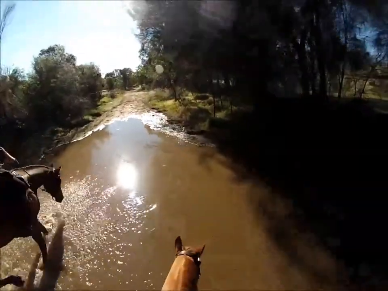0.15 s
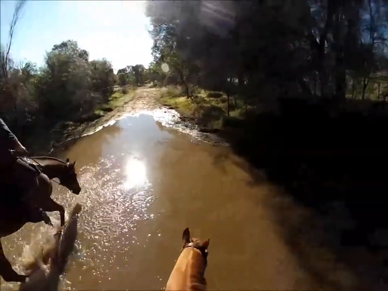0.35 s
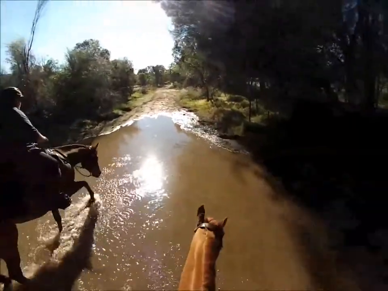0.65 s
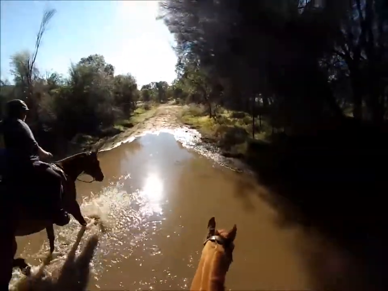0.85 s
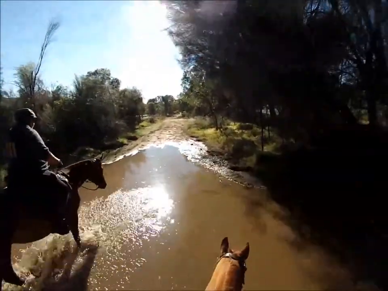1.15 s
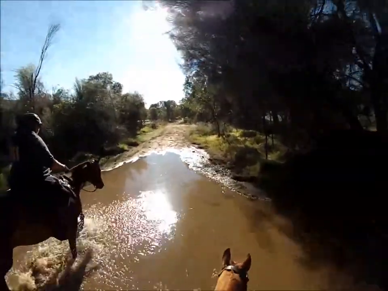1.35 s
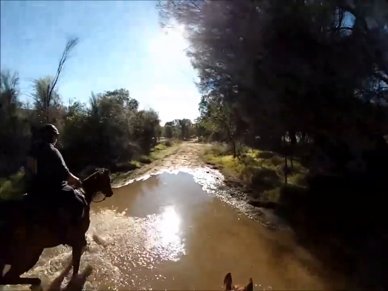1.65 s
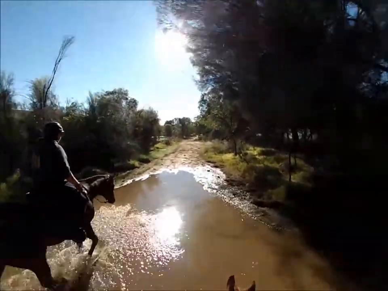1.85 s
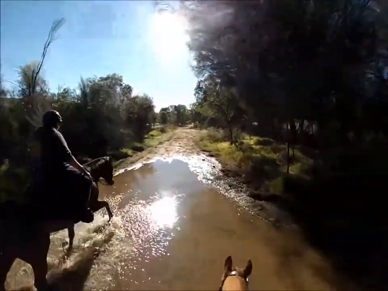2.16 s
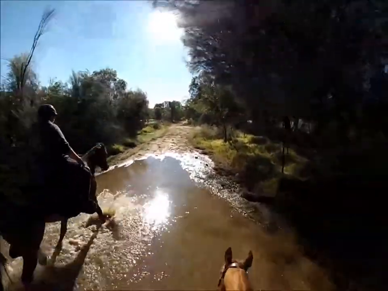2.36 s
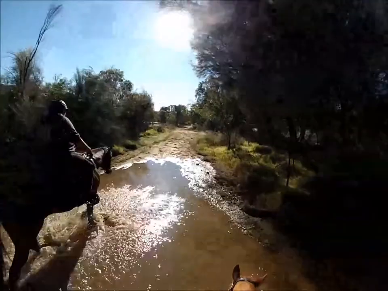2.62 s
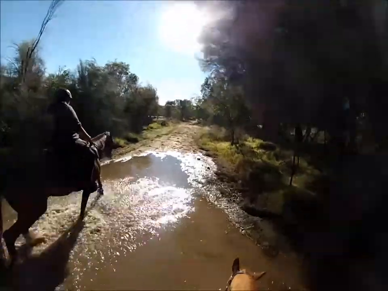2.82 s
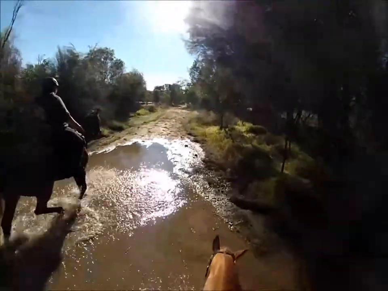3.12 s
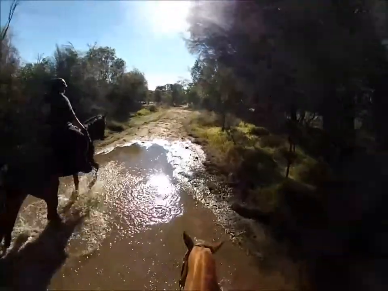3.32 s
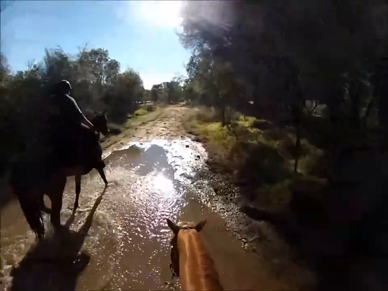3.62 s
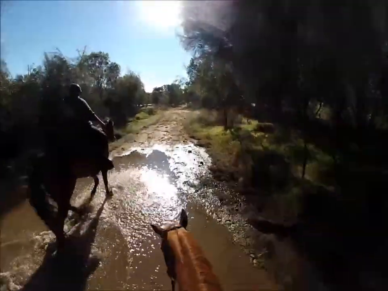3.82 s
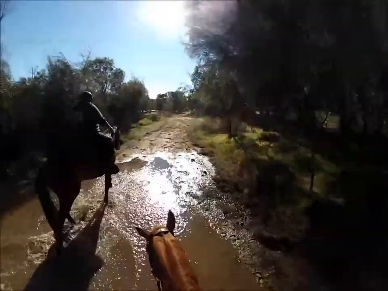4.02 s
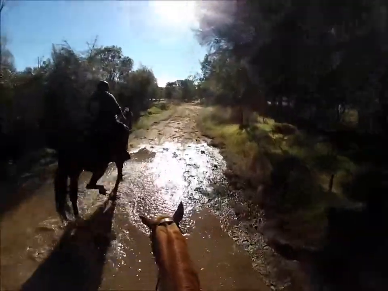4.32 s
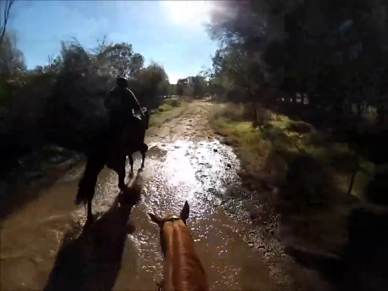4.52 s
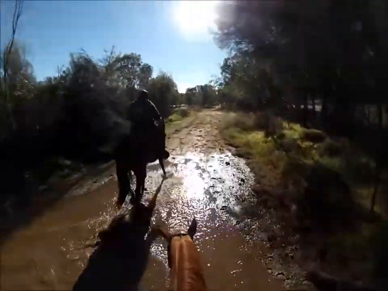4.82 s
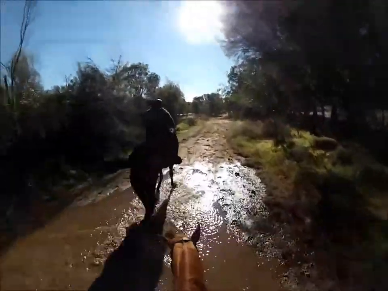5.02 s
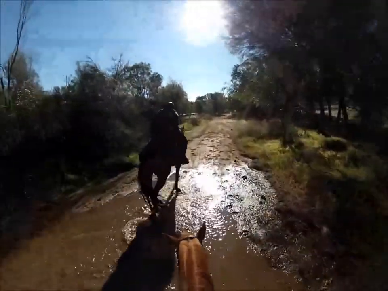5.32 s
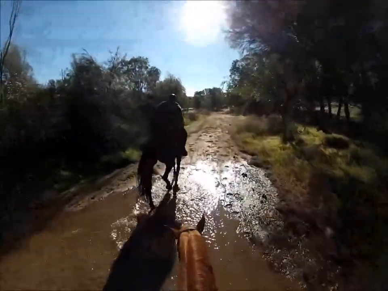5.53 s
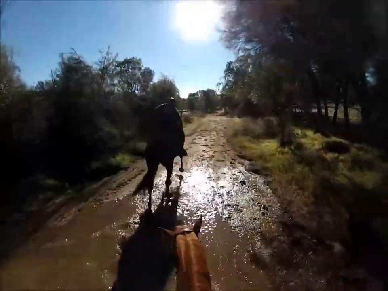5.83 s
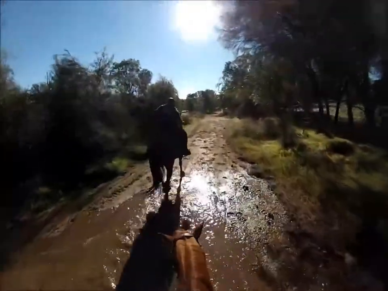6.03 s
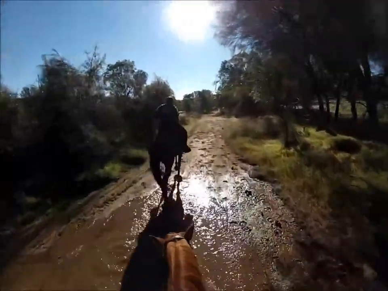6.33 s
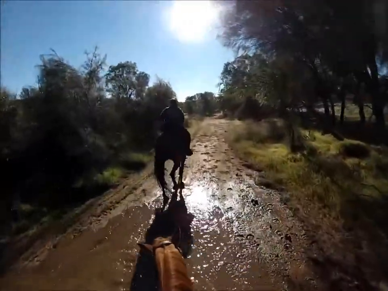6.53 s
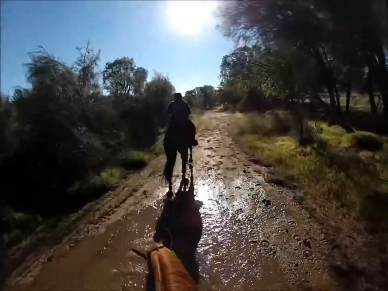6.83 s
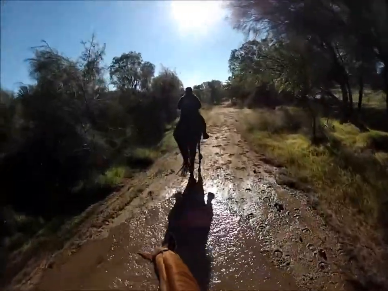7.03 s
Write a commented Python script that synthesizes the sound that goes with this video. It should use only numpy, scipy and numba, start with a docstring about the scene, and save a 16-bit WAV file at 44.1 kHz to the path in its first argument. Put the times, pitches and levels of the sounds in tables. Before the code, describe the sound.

Close, slightly boxy sound from a camera carried on horseback: rhythmic watery sweeps, fizzing bubbles, drips and wet slaps over faint outdoor hiss. Low thuds from the stride jolt the mount throughout, and one much louder deep shudder strikes just after one second. From three seconds the deep slosh thins, leaving separate shallow splashes and slaps on mud.

```python
"""Horses wade through a flooded track: legs sweep up bubbles, splash and spray; hooves slap and plop.
Throughout, jolts of the stride thud a springy camera mount, air buffets its case and the case rings.
At about 1 s a short swish and a dull rub of gear lead into a heavy judder of the mount, over by 1.4 s.
From 3 s the water gets shallower: big bubbles thin out and the churned wash dies away towards wet mud.
Water is clouds of rising damped sines; slaps are shaped noise; the mount is low sines and noise."""
import sys
import numpy as np
from scipy import signal
from scipy.fft import rfft, irfft
from scipy.io import wavfile
from scipy.ndimage import uniform_filter1d
from numba import njit

SR = 44100
rng = np.random.default_rng(int(sys.argv[2]) if len(sys.argv) > 2 else 0)


def dump_mix(stems):
    """Bounce the given channels to the path in sys.argv[1] as a 16-bit WAV at rate SR."""
    frames = np.atleast_2d(stems).T  # one column per channel
    limited = np.clip(frames, -1, 1)  # hard clip at full scale
    pcm = np.round(limited * 32767).astype(np.int16)
    wavfile.write(sys.argv[1], SR, pcm)


N = 316061
T = np.arange(N) / SR

# jolts of the mount: t/s, swing level before common gain/dB, swing t60/s, knock level before offset/dB
JOLTS = [(0.01, -38.5, 0.47, -17), (0.352, -32.5, 0.14, -12.5), (0.784, -35.5, 0.3, -15),
         (0.862, -38, 0.11, -22), (1.575, -37, 0.29, -10.5), (1.753, -35, 0.31, -14),
         (1.857, -31.5, 0.19, -28), (1.941, -29.5, 0.17, -36), (2.735, -26.5, 0.42, -13.5),
         (2.963, -33, 0.14, -24), (3.062, -36, 0.19, -10), (3.307, -30, 0.25, -7.5), (3.529, -36, 0.2, -19),
         (3.659, -37.5, 0.17, -11), (3.818, -28, 0.16, -17), (4.111, -36, 0.28, -24),
         (4.543, -30.5, 0.38, -12.5), (4.905, -37.5, 0.17, -16), (5.321, -31.5, 0.23, -16),
         (5.68, -40, 0.28, -29), (5.996, -23.5, 0.2, -17.5), (6.064, -35.5, 0.39, -26),
         (6.333, -37, 0.23, -17), (6.744, -33.5, 0.14, -27), (6.804, -25, 0.21, -20.5)]
# resonances of the case: f/Hz, width at half the lift/Hz, lift/dB
CASE_PEAKS = [(1511, 490, 14.5), (2078, 283, 13), (2385, 480, 10.5), (3107, 180, 5), (3616, 480, 7),
              (4160, 290, 4), (4920, 460, 7), (6580, 380, 7.5), (7420, 1000, 5.5), (8970, 290, 6),
              (11160, 670, 6)]
# transmission of the case walls: f/Hz, gain/dB
CASE_WALL = [(200, 4.5), (600, -2.5), (1000, 3.5), (1850, -3), (2800, -4.5), (4500, -9.5), (6000, -9),
             (8300, -15), (10000, -20), (13000, -17.5), (15500, -30)]
# legs sweeping through water: crest t/s, splash/dB, spray/dB, deep slosh/dB, length/s
STEPS = [(0.034, -58, -73, -66, 0.096), (0.306, -56, -71, -60, .05), (0.406, -56.5, -75, -62.5, 0.065),
         (0.615, -58, -65, -64, 0.087), (0.72, -56, -67.5, -64, 0.062), (0.87, -55.5, -72, -62.5, 0.1),
         (1.053, -50.5, -70, -61, 0.13), (1.158, -57, -77, -54, 0.042), (1.446, -55, -65.5, -69, 0.13),
         (1.555, -57.5, -66, -65, 0.095), (1.84, -53.5, -63, -59.5, 0.063), (1.954, -58, -77, -59.5, 0.033),
         (2.206, -54, -60, -66.5, 0.11), (2.47, -60.5, -65, -65, 0.11), (2.57, -53, -64.5, -59.5, 0.084),
         (2.738, -56.5, -65, -61.5, .1), (2.974, -53.5, -62.5, -66, 0.2), (3.13, -53.5, -67, -62, 0.043),
         (3.21, -54.5, -61.5, -61, 0.082), (3.367, -72, -69, -74, .07), (3.523, -53, -66.5, -63.5, 0.12),
         (3.653, -56, -68, -68, 0.054), (3.842, -53, -62, -64.5, 0.08), (3.99, -62, -67.5, -62.5, .08),
         (4.145, -53.5, -67, -64, 0.077), (4.276, -62, -70, -87, .06), (4.444, -52, -64, -65, 0.095),
         (4.727, -53.5, -68, -63.5, 0.074), (4.855, -59.5, -68.5, -74, 0.17),
         (5.03, -53.5, -64.5, -69, 0.072), (5.31, -54.5, -76, -64, 0.06), (5.467, -61, -84, -74, 0.12),
         (5.654, -54, -72, -65, 0.12), (5.855, -61, -85, -75, 0.068), (6.007, -58.5, -74, -69, 0.12),
         (6.264, -65, -70, -74, 0.046), (6.364, -55.5, -78, -68, 0.087), (6.516, -66, -73.5, -70, 0.052),
         (6.713, -60, -79, -65.5, 0.093), (7.028, -55.5, -72, -66, 0.081)]


def undb(db):
    """Decibels to gain."""
    return 10 ** (np.asarray(db) / 20)


def curves(rows):
    """Interpolate each column of a table over time."""
    s, *columns = np.transpose(rows)
    return [np.interp(T, s, c) for c in columns]


def band(x, lo_hz, hi_hz, order=3):
    """Butterworth band-pass."""
    sos = signal.butter(order, [lo_hz, min(hi_hz, .48 * SR)], "band", fs=SR, output="sos")
    return signal.sosfilt(sos, x)


def unit(x, lo_hz, hi_hz):
    """Scale to rms 1 within a band."""
    return x / np.std(band(x, lo_hz, hi_hz))


def add(out, s, x):
    """Mix a sound in at a time in seconds."""
    i = max(int(s * SR), 0)
    out[i:i + len(x)] += x[:max(N - i, 0)]


def walk(rate_hz):
    """Random levels held for 1 / rate, smoothed by two moving averages; spread near 1."""
    k = int(SR / rate_hz)
    held = np.repeat(rng.standard_normal(N // k + 1), k)
    smooth = uniform_filter1d(uniform_filter1d(held, k), k)
    return 1.17 * smooth[:N]


def colour(x, points, peaks=(), size=2048):
    """Minimum-phase filter: a smooth spectrum with resonant peaks on it."""
    f = np.fft.rfftfreq(size, 1 / SR)
    hz, db = np.transpose(points)
    gain_db = np.interp(np.log(f + 1), np.log(hz), db)
    for centre_hz, width_hz, lift_db in peaks:
        gain_db = gain_db + lift_db * .5 ** ((2 * (f - centre_hz) / width_hz) ** 2)
    # folding the cepstrum makes the filter causal
    cepstrum = irfft(np.log(undb(gain_db)))
    cepstrum[1:size // 2] *= 2
    cepstrum[size // 2 + 1:] = 0
    impulse = irfft(np.exp(rfft(cepstrum)))
    return signal.oaconvolve(x, impulse)[:len(x)]


def through_case(x):
    """Walls dull the sound; the hollow case adds resonances."""
    return colour(x, CASE_WALL, CASE_PEAKS)


@njit
def ring(start, hz, cycles, size, glide):
    """Sum of damped sines that rise in pitch as they fade."""
    out = np.zeros(N)
    for k in range(len(start)):
        length = int(cycles[k] * SR / hz[k]) + 2
        i0, phase = int(start[k]), 0.
        for i in range(min(length, N - i0)):
            age = i / length
            phase += 2 * np.pi * min(hz[k] * (1 + glide * age) / SR, .45)
            out[i0 + i] += size[k] * np.exp(-5 * age) * np.sin(phase)
    return out


def bubbles(rate, lo_hz, hi_hz, cycles, spread_db, glide):
    """Random cloud of bubbles, rate per second; a positive spread makes many faint, a few loud."""
    when, pitch, life, strength = rng.random((int(rate * N / SR), 4)).T
    hz = lo_hz * (hi_hz / lo_hz) ** pitch
    size = undb(-spread_db * np.log(strength + .015))
    # life is counted in cycles, so high bubbles die sooner; amplitude grows with pitch
    return ring(when * N, hz, cycles * (.5 + life), size * hz / hi_hz, float(glide))


def outdoors(db=-64):
    """Steady outdoor hiss: noise with a fixed spectrum."""
    # f/Hz, relative density/dB
    spectrum = [(100, 10.5), (250, 7.5), (500, 2.5), (1000, -5), (2200, 1), (3000, -4), (6000, -6.5),
                (10000, -9.5), (15500, -17.5)]
    hiss = colour(rng.standard_normal(N), spectrum)
    return hiss / np.std(hiss) * undb(db)


def tremble():
    """Between jolts the sprung mount shivers near 57 Hz; slow air buffets the case, more at each lurch."""
    # shiver: t/s, level/dB
    shiver = [(0, -44), (0.45, -47.5), (0.66, -58), (0.85, -42.5), (1.5, -48.5), (1.95, -44), (2.15, -49.5),
              (2.5, -47), (3.7, -46.5), (4.3, -47), (4.7, -50), (5.6, -47.5), (6.6, -53.5), (7.1, -45.5)]
    steady_air_db, lurch_air_db, lurch_s = -48.5, -43.5, 0.1
    # f/Hz, relative gain/dB
    response = [(20, -14.5), (42, -8), (57, 7.0), (68, -8.0),
                (95, -14.5), (150, -24.5), (230, -35.0), (600, -55.5)]
    mount = colour(rng.standard_normal(N), response, size=8192)
    air = band(rng.standard_normal(N), 8.54, 24.26)
    lurch = sum(np.exp(-((T - s - lurch_s / 2) / lurch_s) ** 2) for s, *_ in JOLTS)
    buffet = undb(steady_air_db) + undb(lurch_air_db) * np.minimum(lurch, 1)
    return mount / np.std(mount) * undb(curves(shiver)[0]) + air / np.std(air) * buffet


def rub(at_s=0.98, length_s=0.1, db=-54):
    """Gear rubs the mount ahead of the heavy bump: a dense cloud of low, short rings."""
    grains = bubbles(rate=970, lo_hz=100.5, hi_hz=405, cycles=6.8, spread_db=5.5, glide=0)
    scuff = band(grains, 78, 290, order=2)
    swell = np.exp(-.5 * ((T - at_s) / length_s) ** 2)
    return scuff / np.std(scuff) * undb(db) * swell


def swish(at_s=0.95, length_s=0.037, db=-55.0, trail_s=0.081):
    """A ragged swish before the heavy bump: narrow-band rings that swell quickly and trail off."""
    grains = bubbles(rate=1500, lo_hz=4400, hi_hz=5400, cycles=25, spread_db=3.0, glide=0)
    hiss = band(grains, 4680, 5120, order=1)
    rise = np.exp(-.5 * ((T - at_s) / length_s) ** 2)
    fall = 1 / (1 + ((T - at_s) / trail_s) ** 2)
    return hiss / np.std(hiss) * undb(db) * np.where(T < at_s, rise, fall)


def thuds():
    """A jolt knocks the mount, which then swings at its own low pitch."""
    out, t = np.zeros(N), T[:SR // 2]
    swing_hz, knock_hz, knock_t60_s = 57, 102, 0.087
    attack = 1 - np.exp(-(t / 0.007) ** 2)
    for s, db, t60_s, knock_db in JOLTS:
        swing = np.sin(2 * np.pi * swing_hz * t) * undb(-60 * t / max(t60_s, .05))
        knock = np.sin(2 * np.pi * knock_hz * t) * undb(knock_db + 11.5 - 60 * t / knock_t60_s)
        add(out, s, undb(db + 3.0) * attack * (swing + knock))
    return out


def judder():
    """A hard bump drives the mount against its stop: pitch and overtones shift, then it rings out."""
    # t/s, f/Hz, level/dB, second harmonic re fundamental/dB
    bump = [(1.0, 61, -42, -12), (1.04, 66, -32, -7), (1.06, 69, -17, -22), (1.086, 72.9, -18, -8),
            (1.115, 65.7, -15, -17.5), (1.141, 58.6, -13.5, -18.5), (1.165, 55.4, -9, -33),
            (1.2, 58.5, -18, -44), (1.28, 56.6, -29.5, -47), (1.38, 56.7, -51.5, -42)]
    hz, db, overtone_db = curves(bump)
    phase = 2 * np.pi * np.cumsum(hz) / SR
    stiff = undb(overtone_db)
    swing = np.sin(phase) + stiff * np.cos(2 * phase) + 0.28 * stiff ** 2 * np.sin(3 * phase)
    to_edge_s = np.minimum(T - bump[0][0], bump[-1][0] - T)
    return swing * undb(db) * np.clip(to_edge_s / 0.018, 0, 1)


def spatter(db=-71):
    """Flecks of water and mud land as single two-cycle ticks through the case."""
    ticks = through_case(bubbles(rate=70, lo_hz=1500, hi_hz=6960, cycles=2.0, spread_db=4.0, glide=0))
    return ticks / np.std(ticks) * undb(db)


def plops():
    """Air pockets close behind a leg; each rings briefly and rises as it nears the surface."""
    # t/s, level before trim/dB, f before trim/Hz
    pockets = [(.071, -48.5, 231), (.297, -49, 690), (0.353, -48, 320), (0.426, -47, 362),
               (0.758, -50, 338), (0.82, -53, 280), (1.004, -45, 294), (1.155, -43.5, 373),
               (1.521, -50.5, 294), (1.6, -51, 330), (1.792, -47, 340), (1.959, -48, 380),
               (2.287, -42, 277), (2.365, -47.5, 306), (2.691, -45.5, 360), (3.957, -56, 261),
               (4.014, -49, 899), (4.12, -50, 640), (5.67, -50, 790), (6.229, -46, 630)]
    s, db, hz = np.transpose(pockets)
    return ring(s * SR, hz * 0.972, np.full(len(s), 11.0), undb(db - 0.5), 0.13)


def hooves():
    """Slaps on water and mud: wet noise cracks ring the case, with a rising plip of trapped air."""
    # t/s, level/dB, treble before offset/dB, starting f of trapped air/Hz, t60 of cracks/s
    slaps = [(0.403, -44, -32, 1540, 0.073), (0.5142, -42, -37, 1520, 0.024),
             (0.7244, -44.5, -19, 1930, 0.048), (1.454, -43.5, -16, 2040, 0.05),
             (1.5434, -45, -29, 2030, 0.05), (1.9719, -40.5, -28, 2090, 0.053),
             (3.0989, -46, -22, 1350, 0.05), (3.1351, -41, -28, 1290, 0.045),
             (3.2174, -40, -19, 2150, 0.046), (3.8107, -40.5, -36, 1350, 0.064),
             (4.4323, -41.5, -26, 2210, 0.046), (4.7813, -36, -26.5, 2236, 0.019),
             (4.9541, -46.5, -28, 2170, 0.043), (5.0494, -46, -20, 2140, 0.055),
             (5.089, -46.5, -23, 1364, 0.046), (5.4106, -44.5, -21, 1990, 0.054),
             (5.64, -40.5, -23.5, 1990, 0.051), (5.6745, -47, -36, 2230, 0.042),
             (5.713, -45.5, -34, 2050, 0.064), (6.194, -48, -28, 2030, 0.052),
             (6.2317, -49.5, -24, 2020, 0.036), (6.3704, -46.5, -22, 2040, 0.043),
             (6.3994, -47.5, -37, 2060, 0.05), (6.7537, -50, -7, 2200, 0.046),
             (7.0294, -52, -17, 2090, 0.055)]
    out, t = np.zeros(N), T[:SR // 5]
    attack = np.minimum(t / .0015, 1)
    for s, db, treble_db, hz, t60_s in slaps:
        cracks = rng.standard_normal(len(t)) * undb(2.0 * rng.standard_normal(len(t)))
        cracks *= attack * undb(-60 * t / max(t60_s, .01))
        treble = undb(treble_db + 27.5) * band(cracks, 3050, 13300)
        slap = through_case(band(cracks, 580, 3000) + treble)
        plip = np.sin(2 * np.pi * hz * t * (1 + 2 * t)) * attack * undb(-5 - 60 * t / 0.06)
        add(out, s, (slap / np.abs(slap).max() + plip) * undb(db))
    return out


def surges(levels_db, hang=1):
    """Summed power of the steps: each swells to its crest, then falls back, hang times as long."""
    rise_share, fall_share = 0.97, 1  # of the step length
    power = np.zeros(N)
    for (s, *_, length_s), db in zip(STEPS, levels_db):
        age = (T - s) / max(length_s, .01)
        rise = (age / rise_share) ** 2
        fall = np.abs(age / (fall_share * hang)) ** 1.9
        shape = np.exp(-np.where(age < 0, rise, fall))
        power += (undb(db) * shape) ** 2
    return power


def water_levels():
    """Splash, spray and slosh in dB: powers of the steps add to the churned wash between them."""
    # wash, dying away as the horses leave the flood: t/s, level/dB
    wash = [(0, -60.5), (0.9, -57.5), (2.8, -57.5), (3.6, -59), (4.3, -63.5), (5.2, -68.5), (7.1, -74)]
    # level over the fullest wash/dB, and dB lost per dB of wash
    wash_spray_db, spray_follow = -65, .6
    wash_slosh_db, slosh_follow = -69, 0.19
    spray_hang = 1.08
    _, splash_db, spray_db, slosh_db, _ = np.transpose(STEPS)
    wash_db, = curves(wash)
    calm_db = wash_db - wash_db.max()
    splash = surges(splash_db) + undb(wash_db) ** 2
    spray = surges(spray_db, spray_hang) + undb(wash_spray_db + spray_follow * calm_db) ** 2
    slosh = surges(slosh_db) + undb(wash_slosh_db + slosh_follow * calm_db) ** 2
    return 10 * np.log10([splash, spray, slosh])


def wading():
    """Legs churn up deep bubbles; falling water fizzes and drips, fine spray hisses."""
    splash_db, spray_db, slosh_db = water_levels()
    shore_s, deep_db, shallow_db_per_s = 3, 0.7, 2.1
    depth_db = deep_db - shallow_db_per_s * np.maximum(T - shore_s, 0)
    bursts = undb(1.36 * walk(45))
    fizz = through_case(bubbles(rate=2700, lo_hz=764, hi_hz=4150, cycles=5.0, spread_db=1.0, glide=0.15))
    drops = through_case(bubbles(rate=330, lo_hz=800, hi_hz=3800, cycles=36, spread_db=3.6, glide=.14))
    spray = through_case(
        bubbles(rate=4500, lo_hz=3196, hi_hz=15400, cycles=11.3, spread_db=-0.5, glide=0.17))
    slosh = bubbles(rate=360, lo_hz=233.3, hi_hz=1075, cycles=14.0, spread_db=2.5, glide=0.14)
    splash = unit(fizz, 1100, 2700) + unit(drops, 1100, 2700)
    # big bubbles, below 1800 Hz, thin out in shallower water
    big = signal.sosfiltfilt(signal.butter(4, 1800, fs=SR, output="sos"), splash)
    splash = (splash + (undb(depth_db) - 1) * big) * undb(splash_db)
    spray = unit(spray, 5600, 12000) * undb(spray_db)
    slosh = unit(slosh, 260, 900) * undb(slosh_db)
    return bursts * (undb(-6.0) * splash + undb(-2.5) * spray) + undb(-3.0) * slosh


def scene():
    """Water, hooves and the shaking mount at one microphone."""
    water = wading() + hooves() + plops() + spatter()
    mount = thuds() + judder() + tremble() + rub()
    return (water + mount + swish() + outdoors())[None]


def record(dry):
    """The camera cuts the top: steep elliptic low-pass at 15.4 kHz."""
    return signal.sosfilt(signal.ellip(10, .2, 80, 15400, fs=SR, output="sos"), dry)


dry = scene()
out = record(dry)
dump_mix(out)
```